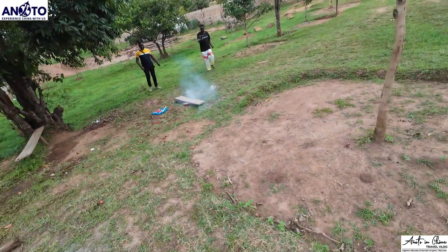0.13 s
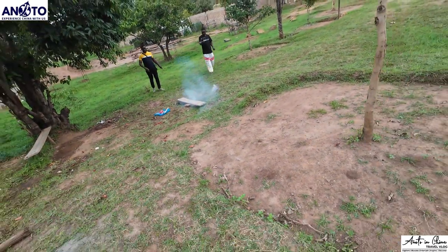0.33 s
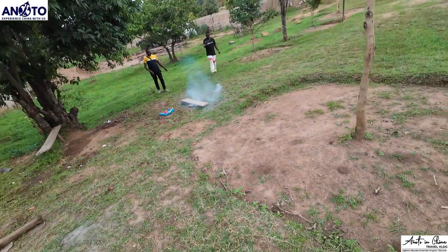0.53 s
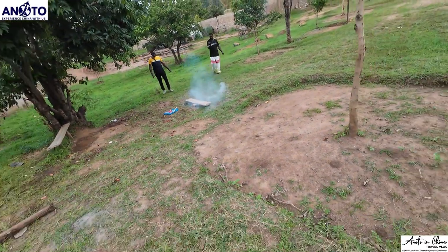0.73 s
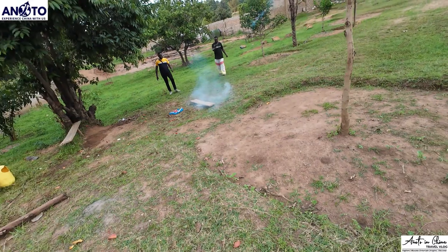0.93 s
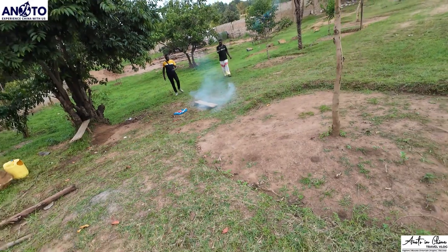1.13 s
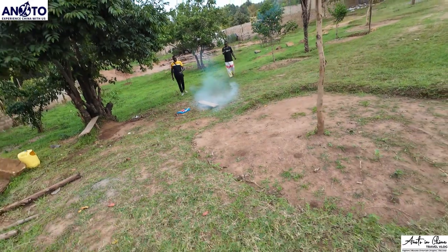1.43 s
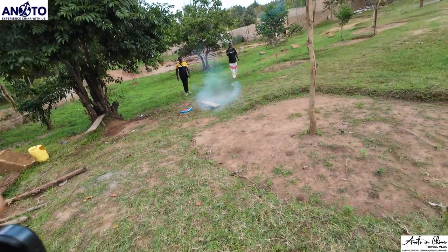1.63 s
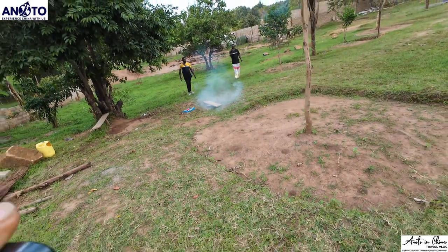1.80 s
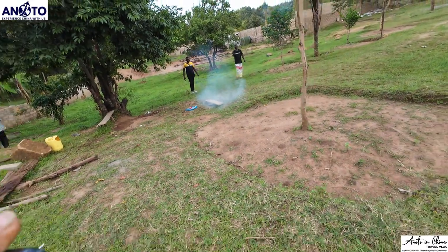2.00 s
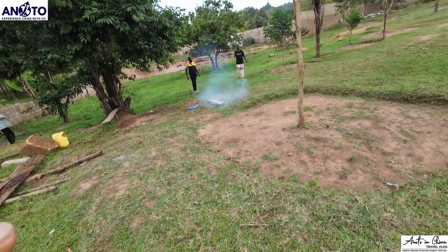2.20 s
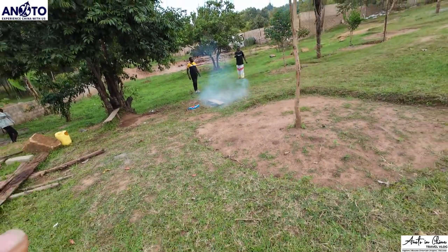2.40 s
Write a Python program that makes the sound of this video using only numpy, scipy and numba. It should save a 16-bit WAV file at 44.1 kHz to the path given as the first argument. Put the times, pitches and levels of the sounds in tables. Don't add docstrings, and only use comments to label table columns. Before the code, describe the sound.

Firecrackers burst in a rapid, irregular string of sharp, overloaded bangs outdoors, then echoes fade.

```python
import sys
import numpy as np
from scipy import signal
from scipy.fft import rfft, irfft, next_fast_len
from scipy.io import wavfile
from scipy.ndimage import uniform_filter1d, minimum_filter1d
from numba import njit

SR = 44100
rng = np.random.default_rng(int(sys.argv[2]) if len(sys.argv) > 2 else 0)


def store_pcm(level_fs):
    pcm = np.round(np.clip(level_fs, -1, 1) * 32767).astype(np.int16)
    wavfile.write(sys.argv[1], SR, np.atleast_2d(pcm).T)


def boost(x):
    u = np.asarray(x, float) / 20
    return 10 ** u


N = 112454

BURST_START_S = [-.22, .1190, .1467, .4309, .5251, .6173, .6460, .7651, .9801, 1.1448, 1.2596, 1.4407,
                 1.4492, 1.4697, 1.5240]
# blast_db, left_overload, right_overload, tail_db
BURSTS = [(17.8, .3, .3, -1.85), (16.7, 1.54, .9, 1.8), (16.6, -0.87, -0.46, 2.7), (18.5, 1.34, 0.52, 2),
          (18.7, 1.08, 0.94, -2), (22.3, 1.7, 1.1, -9.5), (18.5, -0.06, 0.34, -5), (20.8, 1.06, 0.85, 1.5),
          (19.4, 1.42, 0.62, -2.4), (19.6, 1.04, 1.22, 0), (21.9, -0.13, -0.024, 0),
          (13.3, -0.6, 0.0021, -17), (17.6, -0.038, -0.098, 1), (18.84, 2.78, 2.5, 2),
          (18.8, 0.46, 0.61, -5.5)]
# freq_hz, density_db_per_hz
CRACK_SPECTRUM = [(300, -41), (1300, 3.5), (2500, -2.5), (5000, -6), (7500, -23), (10500, -5.5),
                  (15500, -18)]
# delay_s, level_db
GROUND_ECHO = (.0024, -3)
# delay_s, level_db
SOLID_ECHOES = [
    (.0010, -8),
    (.0075, -22),
    (.0545, -24),
    (.020, -22),
]
# freq_hz, density_db_per_hz
FLUTTER_SPECTRUM = [(8, -18), (25, 1.5), (60, -9), (200, -34.5), (400, -57)]
# freq_hz, density_db_per_hz
TREE_SPECTRUM = [(18, -19), (30, -12.5), (90, -17), (233, -13.5), (345, -16.5), (2830, -17), (7090, -26.5),
                 (13300, -24.5), (16000, -53)]
# freq_hz, t60_s
NEAR_DECAY = [(200, 0.067), (2000, 0.32), (12000, 0.32)]
# freq_hz, t60_s
FAR_DECAY = [(60, 2.1), (180, 0.56), (350, 0.63), (800, 1.42), (1500, 1.56), (4000, 1.31), (9000, 0.84),
             (15000, 0.64)]
# delay_s, level_db
SLOPE_LEVELS = [(0, 3.5), (.01, 5.5), (.022, 4.5), (.04, -0.5), (.065, -4), (.12, -1), (.2, 0.5),
                (.35, -2.28)]
# firing_rate_multiple, level_db
ENGINE_ORDERS = [(1, -58), (2, -46.5), (3, -43.5), (4, -56), (5, -93), (7, -54), (8, -45.5), (9, -65),
                 (10, -88)]
# start_s, length_s, start_hz, end_hz, level_db
BIRD_CHIRPS = [
    (1.98, 0.022, 3470, 2930, -39),
    (2.244, .05, 3100, 2270, -45),
    (2.254, 0.022, 4020, 3730, -41),
    (2.4, .012, 3800, 3520, -52),
    (2.408, 0.011, 2440, 3160, -54),
    (2.409, .014, 3230, 3720, -47),
    (2.410, 0.011, 3740, 4180, -51),
    (2.411, .012, 4360, 4700, -59),
    (2.458, 0.013, 3930, 3810, -54),
]
# freq_hz, density_db_per_hz
LEAF_SPECTRUM = [(5000, -30), (7500, -2), (11500, -3), (13500, 0), (15000, -20), (16000, -40)]
# freq_hz, density_db_per_hz
AIR_SPECTRUM = [(30, -6.5), (200, -24), (350, -27.5), (800, -11.5), (3000, -27), (7000, -49), (15000, -56)]
# freq_hz, left_right_correlation
PORT_LIKENESS = [(200, 1), (700, 0.99), (1500, 0.97), (3000, 0.92), (6000, 0.44), (10000, 0.086),
                 (15000, -0.028)]
# freq_hz, gain_db
PORT_RESPONSE = [(4500, 0), (6200, 1.5), (7200, -2.5), (9800, -1.2), (11500, -8.5), (13500, 0),
                 (15300, 6.5), (16000, -25)]
# freq_hz, left_minus_right_db
PORT_LEAN = [(300, -2.1), (2000, 1.7), (5500, 1.5), (9000, -2), (14000, -3)]

PUSH_S = 0.00058
SQUIB = 11


def along(points, hz):
    f, v = np.transpose(points)
    return np.interp(np.log(hz + 1), np.log(f + 1), v)


def unit(x):
    return x / np.sqrt(np.mean(x ** 2) + 1e-20)


def filtered(x, response):
    m = next_fast_len(x.shape[-1] + 2 * SR)
    return irfft(rfft(x, m) * response(np.fft.rfftfreq(m, 1 / SR)), m)[..., :x.shape[-1]]


def add(mix, x, start_s):
    i = round(start_s * SR)
    first = max(i, 0)
    x = x[..., max(-i, 0):][..., :N - first]
    mix[..., first:first + x.shape[-1]] += x


def pair(size, spectrum):
    def mid_side(hz):
        angle = np.arccos(np.clip(along(PORT_LIKENESS, hz), -1, 1)) / 2
        return boost(along(spectrum, hz)) * np.array([np.cos(angle), np.sin(angle)])

    mid, side = filtered(rng.standard_normal((2, size)), mid_side)
    return unit(np.array([mid + side, mid - side]))


def crackers():
    numb_db, suck_db = 0.74, 1
    mix, tails, over = np.zeros((2, N)), np.zeros((2, N)), np.zeros((2, N + SR))
    t = np.arange(SR // 10) / SR
    for k, (start_s, (blast_db, left, right, tail_db)) in enumerate(zip(BURST_START_S, BURSTS)):
        push = blast_push(t, k == SQUIB)
        muffle_db = min(tail_db, 0)
        add(over, boost(blast_db) * np.outer([left, right], overload(t)), start_s)
        add(mix, boost(blast_db) * (push + crack(t, muffle_db)), start_s)
        add_echoes(mix, push, start_s, blast_db + muffle_db, left)
        add(tails, boost(blast_db + tail_db) * debris(t), start_s)
        add(tails, boost(blast_db + tail_db) * scatter(), start_s + 0.002)
    swing = port_swing(over)
    sensitivity = boost(-numb_db * np.maximum(swing, 0) + suck_db * np.minimum(swing, 0))
    return mix + swing + tails * sensitivity


def blast_push(t, is_squib):
    u = t / (PUSH_S * np.exp(rng.normal(0, 0.11)))
    push = -np.where(u < 1, (1 - u ** 6) * (1 - np.exp(-u * 12)), 0)
    if is_squib:
        push = np.where(u < 0.45, -push, push)
    return push


def crack(t, muffle_db):
    level_db, t60_s = -6, 0.014
    envelope = boost(level_db + muffle_db / 2 - 60 * t / t60_s) * np.tanh(t / PUSH_S)
    return envelope * pair(len(t), CRACK_SPECTRUM)


def overload(t):
    rise_s, brim_s, sag_s = 0.00022, 0.0025, 0.01
    late_s = np.clip(t - PUSH_S, 0, None)
    sag = np.exp(-np.maximum(late_s - brim_s, 0) / sag_s)
    return (1 - np.exp(-late_s / rise_s)) * sag


def port_swing(over):
    flutter_share = 0.085

    def high_pass(x, hz, damping):
        return filtered(x, lambda f: -f * f / (hz ** 2 - f * f + 2j * damping * hz * f))

    swing = high_pass(over, hz=2.61, damping=0.68)
    swing = high_pass(swing, hz=0.33, damping=1)[:, :N]
    return swing * (1 + flutter_share * pair(N, FLUTTER_SPECTRUM))


def add_echoes(mix, push, start_s, level_db, left_overload):
    rebound = push - 0.5 * np.roll(push, round(PUSH_S * SR))
    for delay_s, echo_db in [GROUND_ECHO] + list(SOLID_ECHOES):
        shift, size_db, lean = rng.standard_normal(3)
        echo = boost(level_db + echo_db + size_db) * rebound
        if delay_s == GROUND_ECHO[0]:
            echo = echo * np.clip(left_overload, 0.35, 1)
        sides = boost(1.02 * lean * np.array([[1], [-1]]))
        add(mix, sides * echo, start_s + delay_s * (1 + 0.015 * shift))


def debris(t):
    level_db, t60_s, rise_s = -9, 0.056, 0.0013
    envelope = boost(level_db - 60 * t / t60_s) * (1 - np.exp(-t / rise_s))
    return envelope * pair(len(t), TREE_SPECTRUM)


def scatter():
    near_db, far_db, far_rise_s, clump_db = -18, -34, 0.045, 1.8
    hz, t, z = signal.stft(pair(2 * SR, TREE_SPECTRUM), SR, nperseg=128)
    near = boost(near_db - 60 * t / along(NEAR_DECAY, hz)[:, None])
    far = boost(far_db - 60 * t / along(FAR_DECAY, hz)[:, None])
    far = far * (1 - np.exp(-t / far_rise_s))
    clumps = rng.standard_normal(near.shape)
    clumps = uniform_filter1d(clumps, size=9, axis=0)
    clumps = unit(uniform_filter1d(clumps, size=4, axis=1))
    slope_db = np.interp(t, *np.transpose(SLOPE_LEVELS))
    gain = np.hypot(near, far) * boost(slope_db + clump_db * clumps)
    return signal.istft(z * gain, SR, nperseg=128)[1]


def bird():
    mix = np.zeros(N)
    for start_s, length_s, start_hz, end_hz, level_db in BIRD_CHIRPS:
        u = np.arange(int(length_s * SR)) / (length_s * SR)
        pitch_hz = start_hz * (end_hz / start_hz) ** u
        hoarse_rad = 0.073 * np.cumsum(rng.standard_normal(len(u)))
        whistle = np.sin(2 * np.pi * np.cumsum(pitch_hz) / SR + hoarse_rad)
        add(mix, boost(level_db) * np.sin(np.pi * u) * whistle, start_s)
    return mix


def engine():
    firing_hz, in_step_s = 23.7, 2.302
    phase = 2 * np.pi * firing_hz * (np.arange(N) / SR - in_step_s)
    return sum(np.sqrt(2) * boost(level_db) * np.cos(order * phase) for order, level_db in ENGINE_ORDERS)


def leaves():
    level_db, centre_s, width_s = -60.5, 2.25, 0.079
    swell = np.exp(-((np.arange(N) / SR - centre_s) / width_s) ** 2 / 2)
    return boost(level_db) * swell * pair(N, LEAF_SPECTRUM)


def still_air():
    return boost(-50.5) * pair(N, AIR_SPECTRUM)


def scene():
    return crackers() + bird() + engine() + leaves() + still_air()


def port_colour(x):
    def response(hz):
        lean_db = np.outer([0.5, -0.5], along(PORT_LEAN, hz))
        return boost(along(PORT_RESPONSE, hz) + lean_db)

    return filtered(x, response)


@njit
def released(need_db, keep):
    out, held = np.empty_like(need_db), need_db[0]
    for i in range(len(need_db)):
        held = max(need_db[i], held * keep)
        out[i] = held
    return out


def limiter(x):
    ceiling, ahead_s, hold_s, recover_s = 1.11, 0.027, 0.014, 0.079
    ahead, hold = int(ahead_s * SR), int(hold_s * SR)
    gain = np.minimum(1, ceiling / (np.abs(x).max(0) + 1e-9))
    need_db = -20 * np.log10(minimum_filter1d(gain, hold))
    cut_db = released(need_db, np.exp(-1 / (recover_s * SR)))
    early = minimum_filter1d(boost(-cut_db), ahead, origin=-(ahead // 2), mode="nearest")
    return x * uniform_filter1d(early, ahead, origin=(ahead - 1) // 2, mode="nearest")


def soft_clip(x):
    hardness = 16
    return x / (1 + np.abs(x) ** hardness) ** (1 / hardness)


def roll_off(x):
    return signal.sosfilt(signal.butter(12, 16480, fs=SR, output="sos"), x)


def record(dry):
    mix = soft_clip(limiter(port_colour(dry)))
    return roll_off(mix)


dry = scene()
out = record(dry)
store_pcm(out)
```